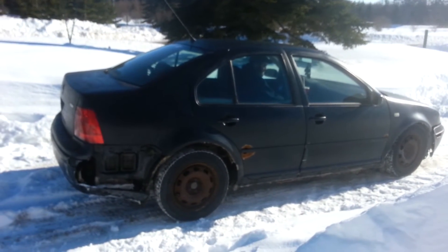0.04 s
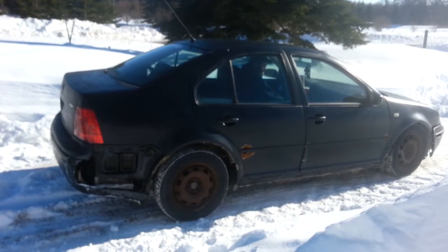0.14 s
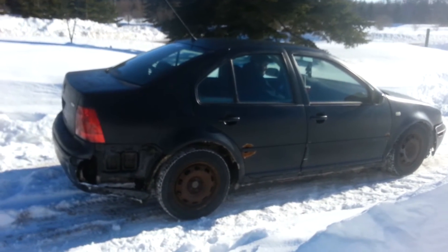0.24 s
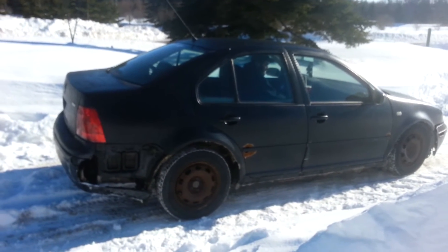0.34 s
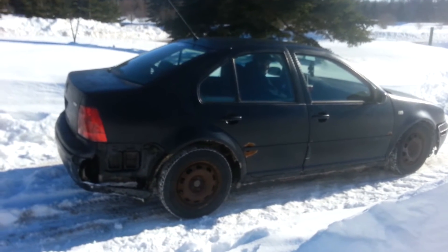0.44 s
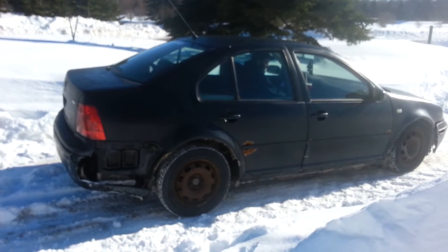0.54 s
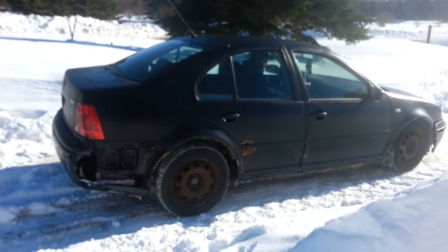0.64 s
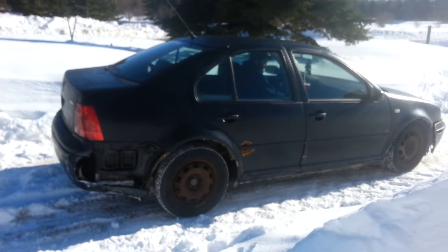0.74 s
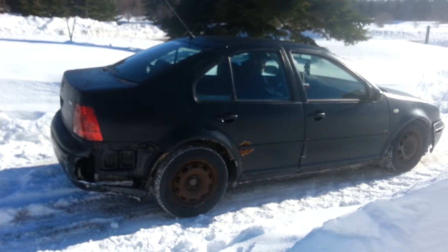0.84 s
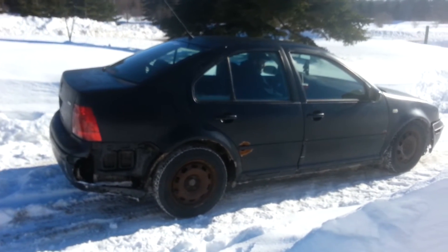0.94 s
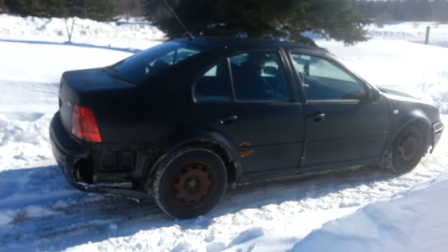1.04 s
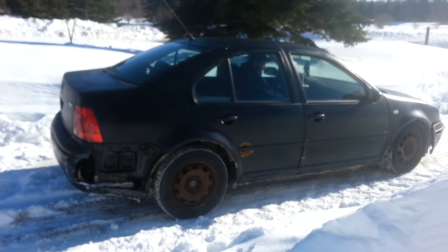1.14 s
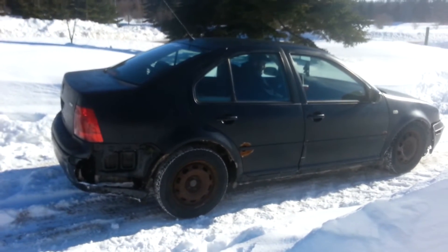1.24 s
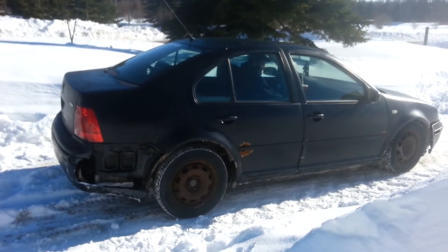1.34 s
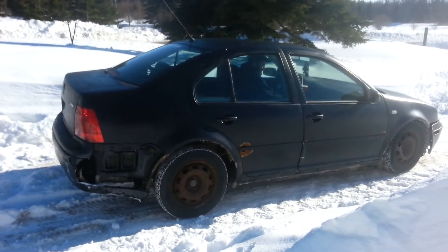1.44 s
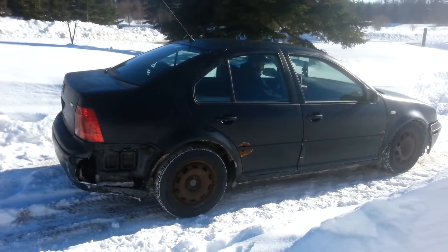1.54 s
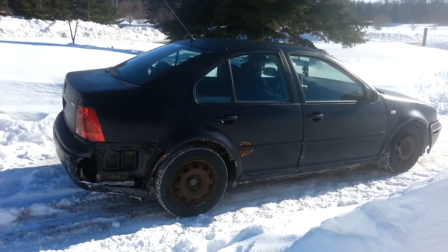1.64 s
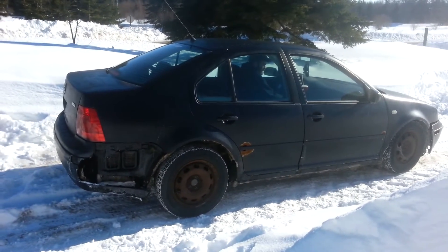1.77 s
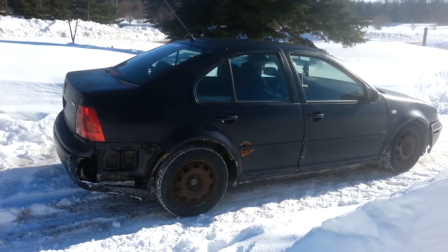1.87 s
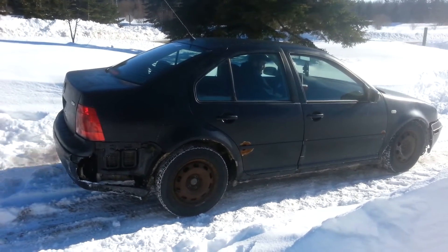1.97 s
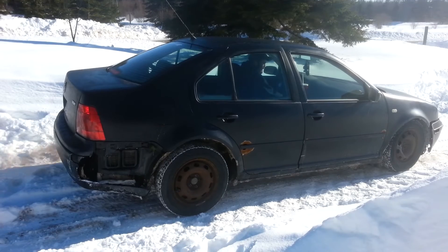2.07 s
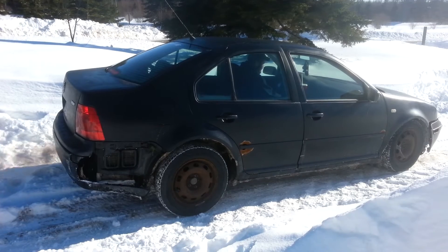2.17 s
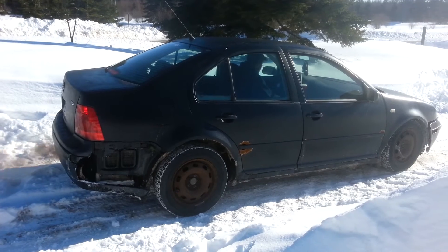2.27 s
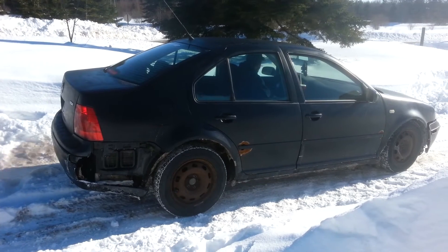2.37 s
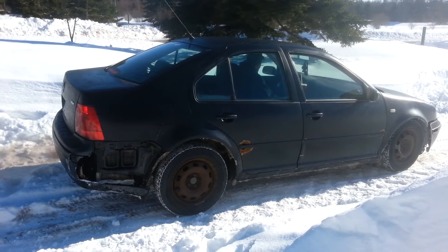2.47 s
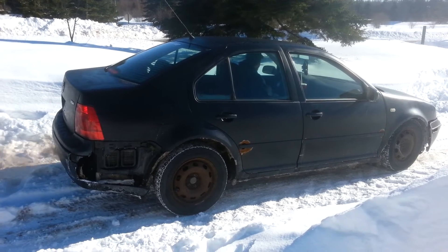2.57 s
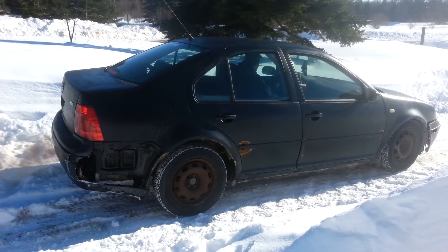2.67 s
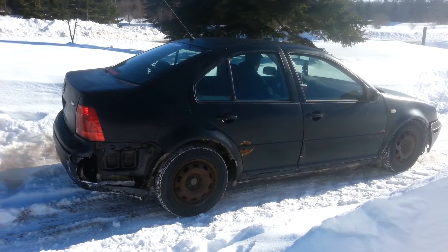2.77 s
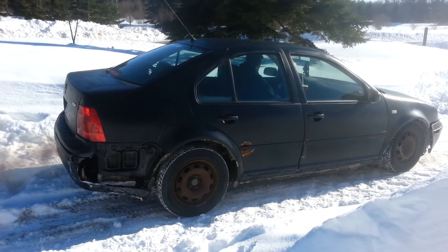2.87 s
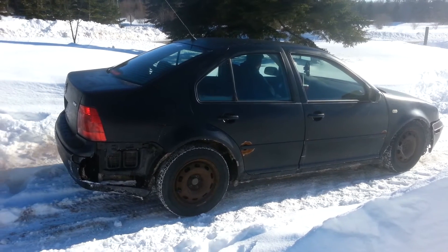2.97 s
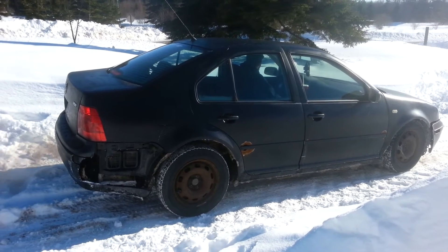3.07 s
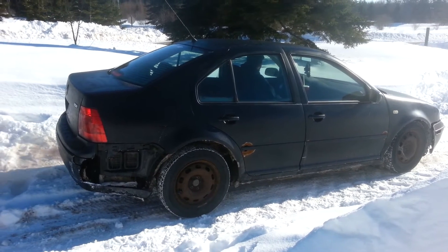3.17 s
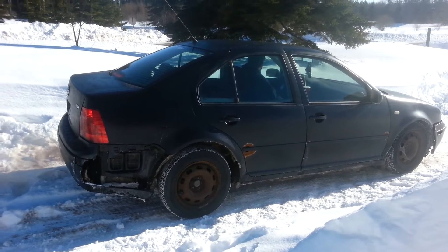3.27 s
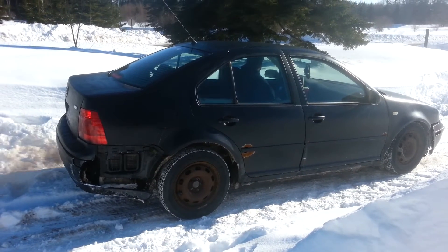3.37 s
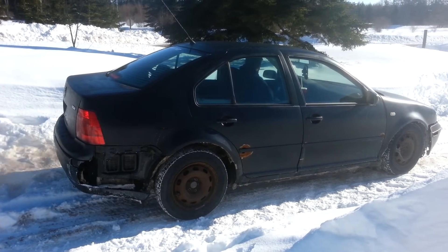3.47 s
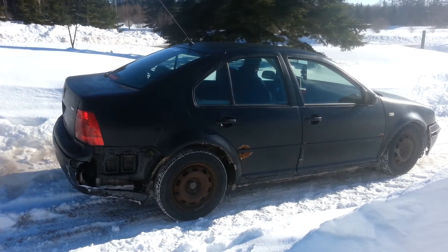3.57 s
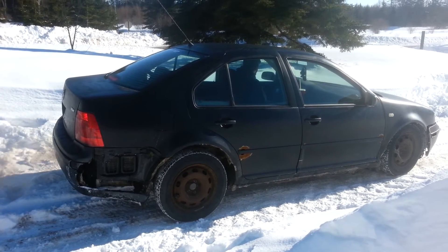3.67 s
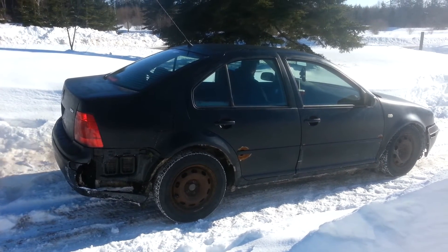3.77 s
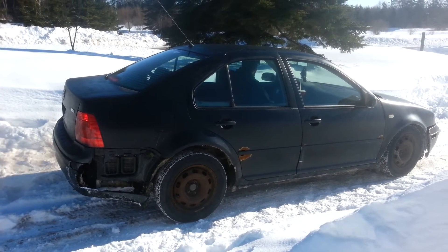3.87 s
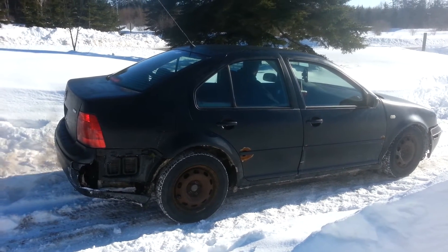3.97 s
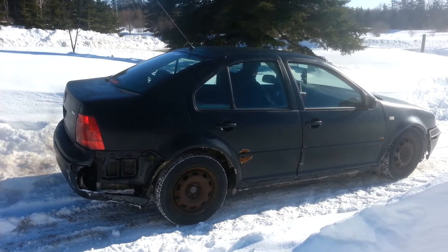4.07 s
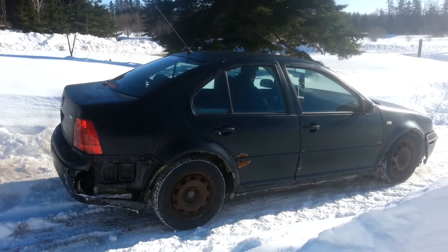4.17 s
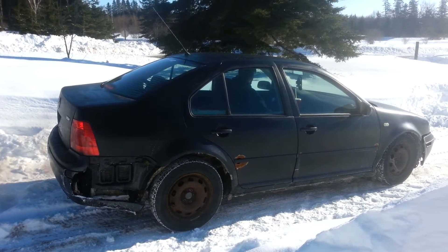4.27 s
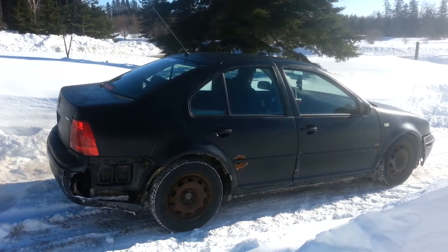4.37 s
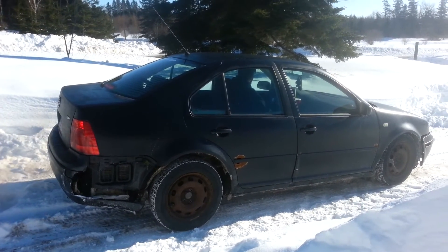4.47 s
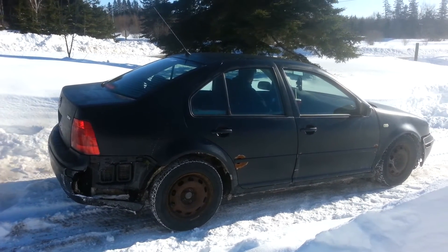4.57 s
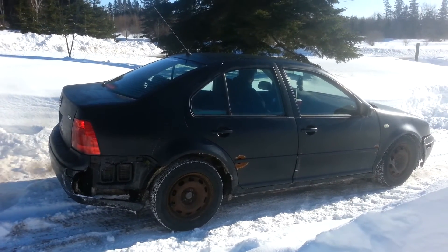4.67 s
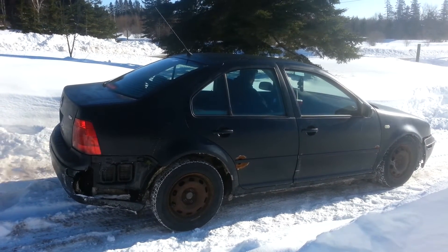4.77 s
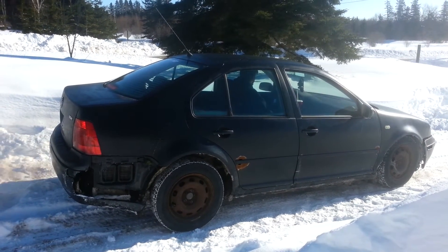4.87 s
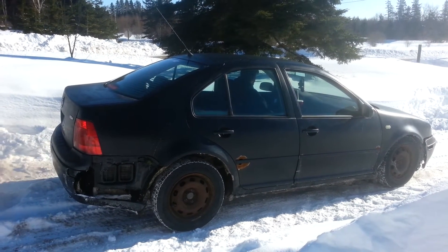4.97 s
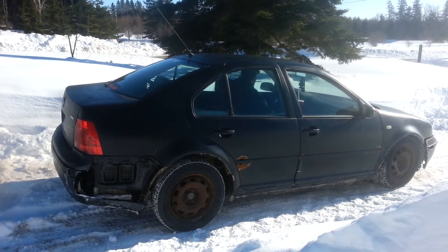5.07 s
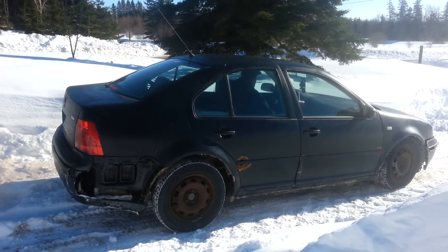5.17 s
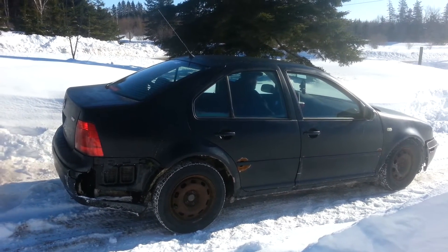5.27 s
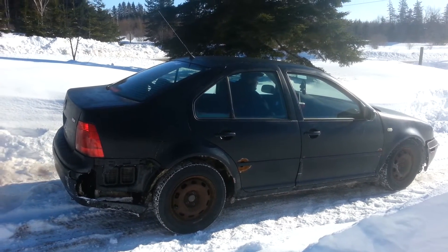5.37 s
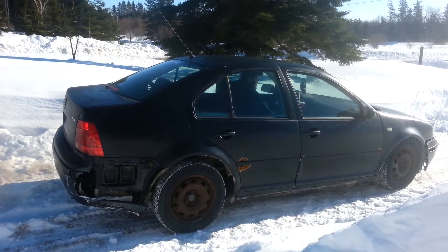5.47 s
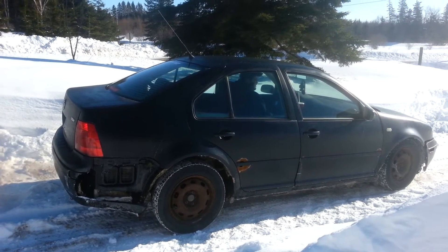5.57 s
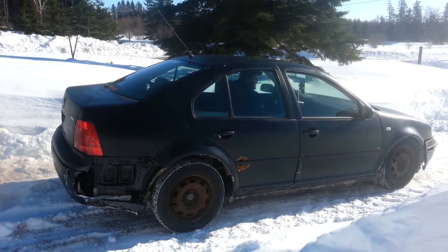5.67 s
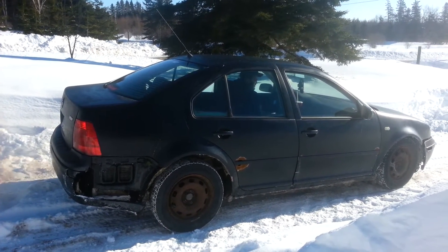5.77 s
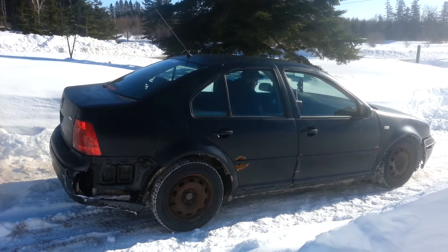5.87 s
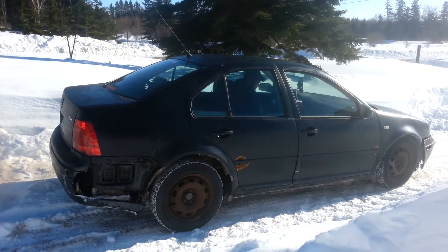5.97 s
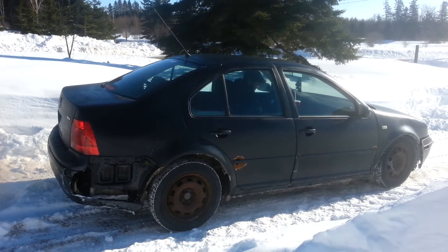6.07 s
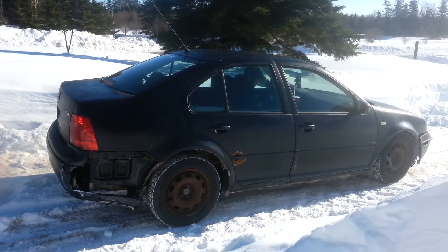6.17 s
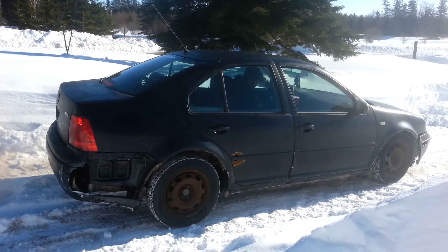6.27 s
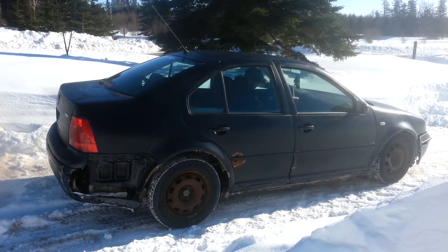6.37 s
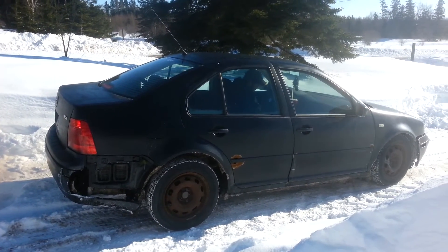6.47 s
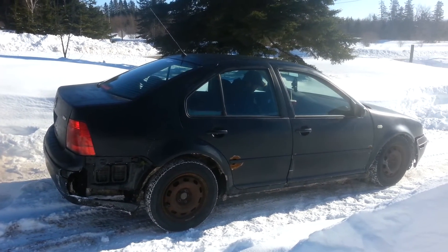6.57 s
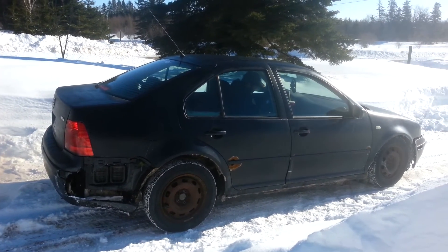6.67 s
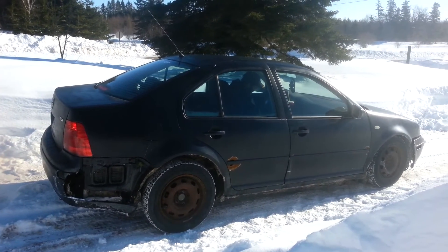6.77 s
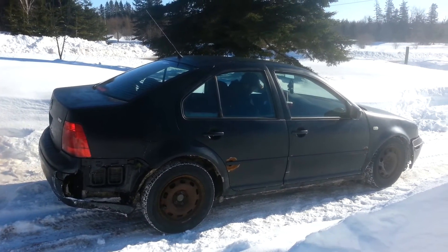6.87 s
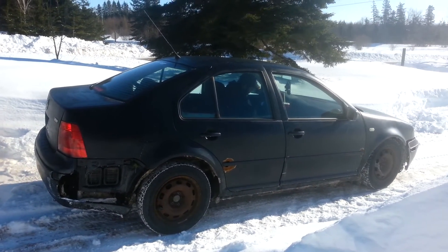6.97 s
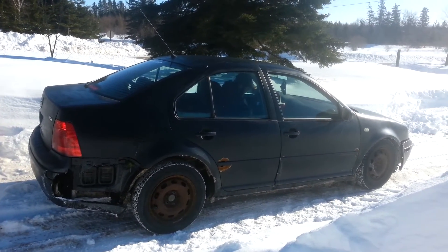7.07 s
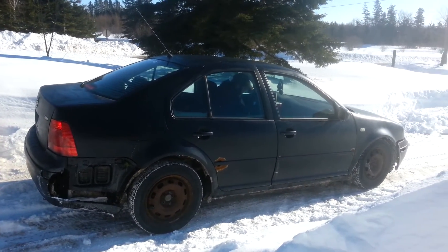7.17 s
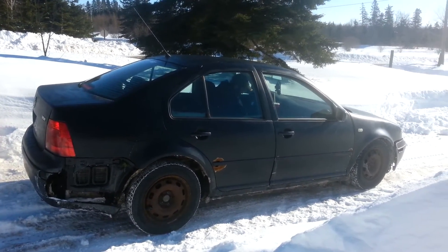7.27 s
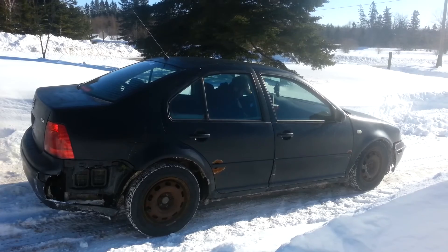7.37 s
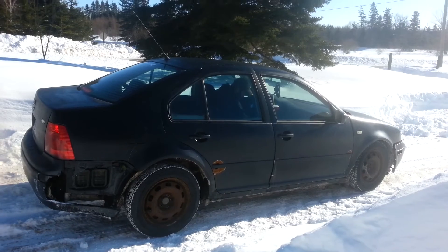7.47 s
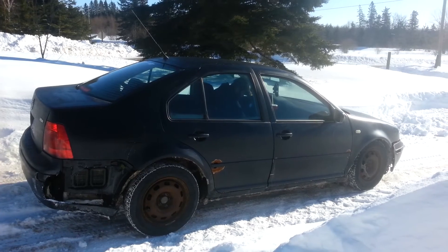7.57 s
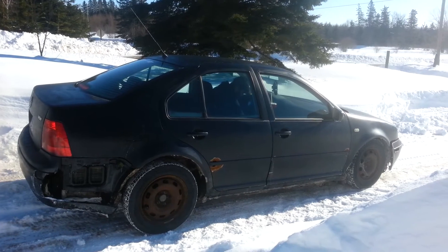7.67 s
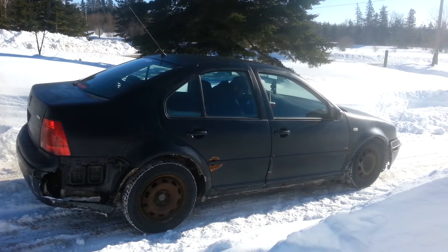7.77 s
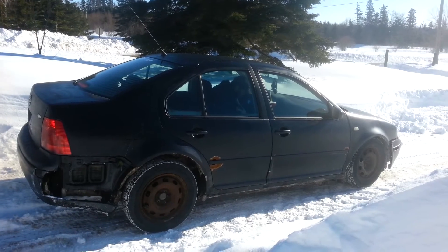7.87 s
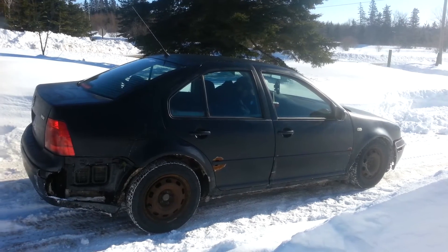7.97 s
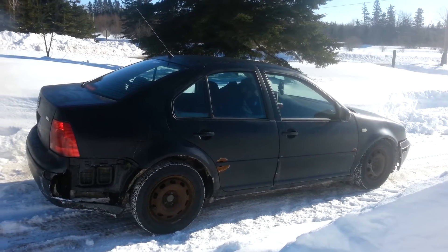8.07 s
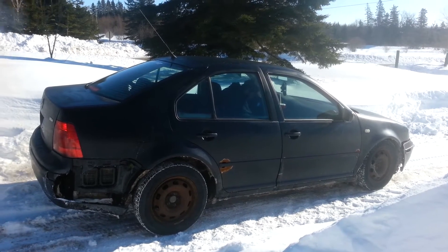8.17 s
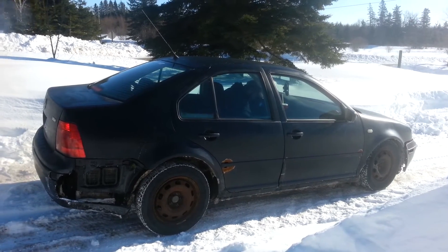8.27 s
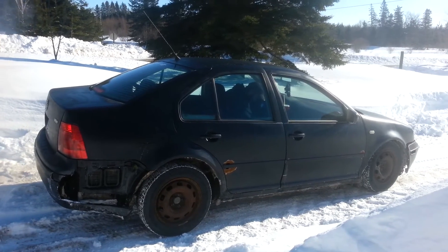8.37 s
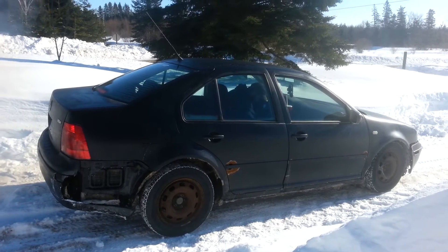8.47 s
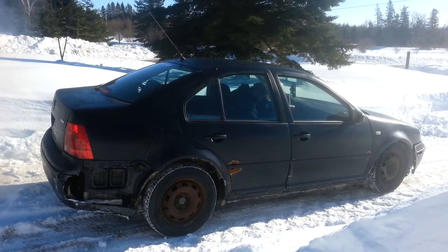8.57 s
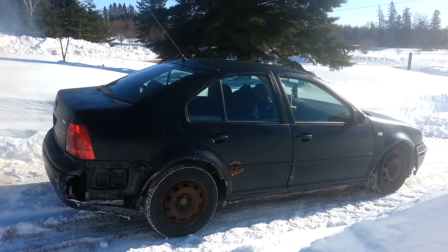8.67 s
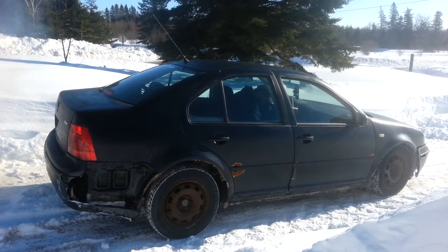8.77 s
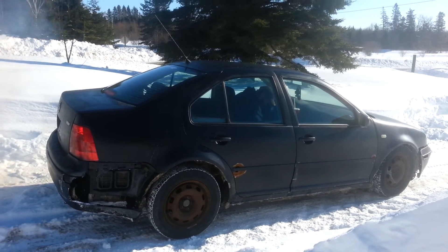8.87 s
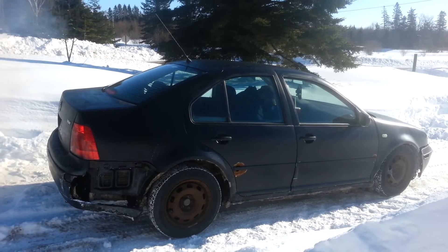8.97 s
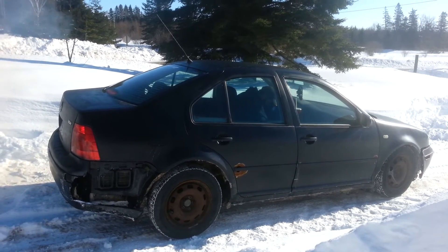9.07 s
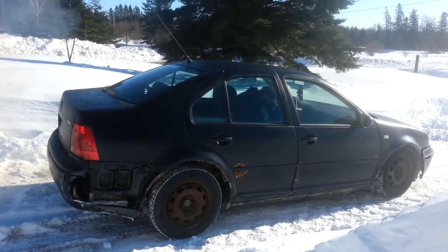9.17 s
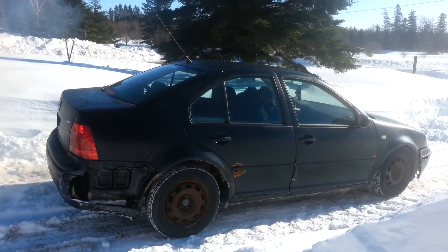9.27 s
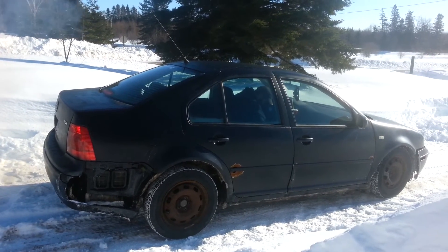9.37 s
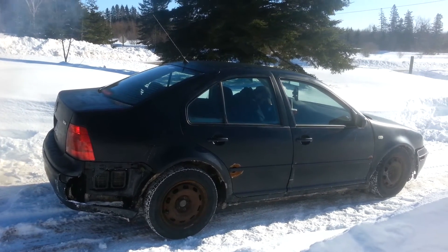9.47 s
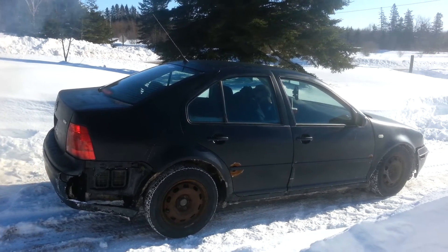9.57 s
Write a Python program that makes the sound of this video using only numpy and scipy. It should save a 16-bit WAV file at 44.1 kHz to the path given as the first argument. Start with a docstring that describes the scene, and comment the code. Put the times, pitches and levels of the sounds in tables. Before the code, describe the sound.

Close beside a car's tailpipe outdoors in snow, a quiet starter churns with short wheezes and weak coughs. After just over a second the diesel catches, racing unevenly with hard exhaust bangs, dry cracks and a breathy hoot. It then slows to a lumpy idle, one cylinder thumping late over constant metallic clatter and a low drone. The stereo pair hears brighter clatter on the left.

```python
"""A starter churns and wheezes, weak strokes cough, and a cold four-cylinder turbodiesel car catches.
It stands outdoors in snow, heard from beside its tailpipe: it flares, hoots and settles to a lumpy idle.
One cylinder keeps firing late and bangs in the pipe, others miss, and the injection clatters throughout.
One crank count times the strokes: pulses ring pipe resonances, noise bursts make gas, rattle and cracks,
short decaying tones make injector pings, and sines make the hoot and the exhaust drone."""
import sys
import numpy as np
from scipy import signal
from scipy.fft import rfft, irfft, next_fast_len
from scipy.io import wavfile
from scipy.ndimage import uniform_filter1d, map_coordinates

SR = 44100
rng = np.random.default_rng(int(sys.argv[2]) if len(sys.argv) > 2 else 0)


def write(x):
    x = np.atleast_2d(x).T
    wavfile.write(sys.argv[1], SR, np.round(np.clip(x, -1, 1) * 32767).astype(np.int16))

N = 425124

# Average speed held by the governor, before surges, stumbles and alignment to the bangs: [t/s, firing rate/Hz]
SPEED = [(1.36, 24.1), (1.55, 29.8), (1.66, 32.3), (1.87, 36.2), (1.98, 42.7), (2.13, 43.6), (2.49, 33.4),
         (2.64, 41.2), (2.84, 35.4), (3.18, 42.0), (3.46, 33.7), (3.65, 38.8), (4.2, 36.6), (6.0, 34.8),
         (8.7, 35.1), (9.0, 37.2), (9.3, 35.1)]
# Strength of the ordinary firings, before stroke-to-stroke differences: [t/s, gas puff/dB, clatter/dB]
LOAD = [(1.4, -17, -26.5), (1.62, -13, -23), (2.1, -14, -25.5), (2.6, -16.5, -23), (3.1, -16.5, -28),
        (3.35, -20, -26.5), (3.6, -14.5, -24.5), (4.1, -21, -27.5), (5.0, -20, -27), (5.7, -22.5, -29.5),
        (7.3, -21, -28.5), (8.7, -20.5, -28), (9.1, -23.5, -34), (9.4, -23, -27.5)]
# Late, hard firings that bang in the exhaust: [t/s, thump/dB, gas puff/dB, front/dB]
BANGS = [(1.3631, -14.5, -14, -15), (1.6502, -10.5, -10, -3), (1.8228, -11.5, -12, -18),
         (1.9728, -8, -8, -5), (2.1305, -17, -12, -21), (2.1531, -11.5, -9.5, -4), (2.2988, -17, -12, -27),
         (2.4579, -10.5, -11.5, -10), (2.5331, -15.5, -11.5, -27), (2.6569, -12, -12, -6.5),
         (2.8672, -11, -12.5, -9), (3.0748, -12.5, -10.9, -10), (3.2643, -15, -10.5, -16),
         (3.3685, -14.5, -16, -15), (3.5356, -15.5, -10.5, -35), (3.5904, -12.5, -9.5, -14),
         (3.9021, -14.5, -10.7, -14), (4.1107, -13.5, -15.5, -19), (4.249, -23, -11, -34),
         (4.3292, -12.5, -11, -15), (4.5386, -11.5, -13, -15), (4.7508, -13.5, -16.5, -11.5),
         (4.9726, -12.5, -11, -16), (5.1905, -10, -13.5, -18.5), (5.4067, -11.5, -13.5, -15.5),
         (5.6222, -12, -18.6, -22), (5.8403, -11.5, -11.5, -19), (6.0611, -12.5, -13.0, -15),
         (6.2798, -16, -13.5, -28), (6.3906, -14.5, -13.2, -21), (6.4996, -16.5, -14.5, -22.4),
         (6.6097, -14, -13.5, -17.5), (6.7195, -15, -16.6, -22), (6.8299, -13.5, -11.5, -15),
         (7.0482, -12.5, -12.5, -16), (7.1559, -14, -16, -29), (7.2684, -11, -14.5, -22),
         (7.3737, -17, -24, -24.8), (7.4829, -14.5, -17.5, -22.3), (7.707, -11.8, -12.5, -14.5),
         (7.812, -19, -20, -29), (7.924, -16, -13.5, -22), (8.0328, -16.5, -18, -29),
         (8.14, -17.0, -20, -31), (8.2474, -13.5, -14.5, -20), (8.3553, -14, -17, -28),
         (8.4637, -13.5, -14, -25), (8.5733, -17.8, -16, -24.1), (8.7928, -10.5, -10.5, -27),
         (9.223, -17.5, -19.7, -35), (9.3335, -16.0, -20.7, -26), (9.444, -17, -14.5, -27),
         (9.5541, -13.5, -13.5, -22.5)]
# Firings that fail: [t/s]
MISFIRES = [1.48, 1.52, 1.73, 1.76, 1.881, 2.04, 2.06, 2.18, 2.2, 2.25, 2.35, 2.4, 2.56, 2.679, 2.969, 3.17,
            3.321, 3.452, 3.771, 3.8, 4.001, 4.439, 4.64, 4.828, 5.048, 5.51, 5.73]
# Weak strokes before the engine catches: [t/s, level/dB, thump relative to that level/dB]
COUGHS = [(0.26, -29, -20), (0.34, -30, -9), (0.5, -26, -19), (0.617, -26, -22), (0.74, -27, -20),
          (0.92, -29.5, -20), (1.022, -21, -11), (1.078, -17.5, -9.5), (1.146, -23.5, -24),
          (1.219, -17.5, -23), (1.277, -19, -7), (1.3225, -14.5, -7.5)]
# Cylinders in firing order, from the one that bangs: [gas puff/dB, clatter/dB, injector ping f/Hz, ping/dB]
CYLINDERS = [(-5.5, -4, 3550, -10.5), (-1, -5, 3500, -1), (-2.5, -6, 2760, -20), (-1, -6.5, 3220, -16)]
# Firings that ignite sharply, with a dry crack: [t/s, level/dB]
SHARP_IGNITIONS = [(1.397, -22), (1.5527, -25), (1.6183, -24), (1.7948, -18), (1.848, -20), (1.9013, -15),
                   (1.926, -24), (1.9504, -21), (2.0156, -27), (2.0857, -22), (2.1086, -22),
                   (2.1326, -15.5), (2.225, -24.5), (2.2758, -13), (2.324, -28), (2.374, -18), (2.43, -17),
                   (2.51, -19), (2.61, -20), (2.7295, -19), (2.8129, -20), (2.8407, -19), (2.9454, -24),
                   (3.0235, -27), (3.0971, -24), (3.5091, -23), (3.565, -21), (3.6875, -20), (3.8198, -27),
                   (3.9291, -36), (4.8908, -22), (4.9472, -18.5), (5.107, -26.5), (5.3234, -21),
                   (6.306, -21), (6.5264, -22), (6.7455, -27), (6.8535, -23), (7.076, -27), (7.2406, -22.5),
                   (7.295, -24), (7.7315, -24.5), (8.488, -23), (9.3599, -27), (9.4702, -28)]
# Whistle of the fast gas at the tailpipe, before swoop and flutter: [t/s, f/Hz, level/dB]
HOOT = [(1.93, 640, -12), (1.97, 720, -10.5), (2.02, 930, -17.5), (2.09, 700, -13), (2.135, 880, -8),
        (2.16, 1030, -15), (2.225, 800, -11), (2.28, 760, -11.5), (2.33, 980, -11.5), (2.38, 810, -14.5),
        (2.435, 740, -16.5), (2.54, 1010, -14.5), (2.59, 880, -13.5), (2.615, 990, -11), (2.735, 1020, -14),
        (2.785, 870, -18), (2.82, 980, -13.5), (2.92, 930, -18), (2.947, 1110, -6.5), (2.99, 900, -16),
        (3.03, 980, -12.5), (3.15, 985, -12), (3.195, 830, -14), (3.28, 830, -20.5), (3.345, 705, -14),
        (3.51, 700, -20.5), (3.6, 750, -13), (3.7, 690, -17), (3.8, 680, -35), (3.95, 680, -19),
        (4.35, 690, -27)]
# Steady note of the exhaust: [t/s, level/dB]
DRONE = [(1.08, -37), (1.19, -45), (1.33, -34), (1.5, -36), (1.85, -23), (2.6, -27), (3.6, -25), (4.1, -27),
         (5.8, -30), (6.4, -29.5), (9.64, -28.5)]
# Harmonics of that note: [multiple of the firing rate, relative level/dB]
DRONE_ORDERS = [(1, -88), (2, 9.5), (3, 19), (4, 9), (5, -17)]
# Whirr of the starter, then of belts and gears: [t/s, level/dB]
WHIRR = [(0.0, -38), (0.9, -36.5), (1.34, -35.5), (1.55, -28.5), (2.6, -28.5), (6.1, -32), (8.7, -30.5),
         (9.1, -34), (9.45, -31.5)]
# Short hisses between the cranking strokes: [t/s, level/dB]
WHEEZES = [(0.425, -47), (0.535, -45), (0.61, -51), (0.7, -50), (0.85, -47), (0.945, -46), (1.02, -45),
           (1.145, -49), (1.225, -44), (1.29, -46)]

# Resonances, all [f/Hz, width/Hz, level/dB]
# Exhaust system
PIPE = [(119.1, 5.1, 1.5), (199, 3.9, 1.5), (245.8, 11.7, 9), (291.5, 12.3, -2), (350.4, 16.2, 2.5),
        (398, 4.1, -1), (430.7, 5.8, -9), (496, 4.6, -9.5), (560, 6.1, -13), (654, 15, -11.5),
        (711, 18, -10.5), (1206, 50, 1), (1635, 200, -9.5), (2430, 150, -6), (3086, 84, 2.5)]
# Colour of the rushing gas
GAS = [(204, 30, 1), (242.4, 36, 9), (358, 33, 3.5), (397.6, 16.5, 6.5), (499.6, 12, 1.5), (658, 89, -0.5),
       (798, 80, -7.5), (963, 55, -4.5), (1130, 42, -9.5), (1557, 114, -14)]
# Engine block and covers
BLOCK = [(1690, 140, -5), (1948, 42, 7), (2208, 90, 7.5), (2530, 170, 3), (2759, 92, 12.5),
         (3087, 79, 10.5), (3390, 53, -16)]
# Ring of a crack
CRACK_RING = [(1024, 120, 1), (1230, 210, 8.5), (1610, 260, 0.5), (1950, 100, 0.5), (2720, 130, 4.5),
              (3030, 73, 0)]
# Ring of the injector snap
INJECTOR = [(3570, 65, -7.5), (4360, 1600, -12.5)]
# Housing of the starter
STARTER_RING = [(1500, 140, -2), (1975, 28, 2), (2100, 56, 4), (2240, 49, -3), (2670, 79, 7),
                (2800, 70, 7.5)]

# Noise spectra, all [f/Hz, relative level per Hz/dB]
# Churning starter
STARTER = [(25, -26), (60, -2.5), (105, 0.5), (130, -0.5), (220, 7), (340, 4), (480, -6), (950, -1),
           (1800, -10), (2450, -6), (2800, -20), (3200, -10), (4000, -19), (6000, -27), (10000, -29.5),
           (14500, -36)]
# Belts and gears
GEARS = [(21, -55), (35, -41), (99, -7.5), (160, -3), (240, -7.5), (301, -11.5), (388, -3.5), (567, -23.5),
         (1180, -14.5), (1410, -25.5), (2400, -20.5), (2730, -22), (5270, -41.5), (9430, -43),
         (14900, -104)]
# Thin metallic sizzle over the knock
SIZZLE = [(2000, -27), (3700, 0), (4500, -33), (5500, 6), (7200, 2.5), (9500, 6), (11000, -2.5),
          (14500, -15.5)]
# Cranking hisses
WHEEZE_COLOUR = [(1500, -20), (3000, 0), (4200, 2), (4900, 4), (5300, -8), (10000, -14), (14500, -30)]

# Left-right likeness of the scattered sound: [f/Hz, correlation 0-1]
ALIKE = [(250, 1), (600, 0.91), (1200, 0.6), (2500, 0), (5000, 0.07), (12000, 0.08)]
# Microphone pair: [f/Hz, left minus right/dB]
BALANCE_DB = [(100, 0.9), (250, -0.5), (550, 1), (1000, -1), (1800, 5.5), (2300, 3), (2780, 9),
              (2970, 11.5), (3150, 10.5), (4300, 11.5), (5300, 4.5), (8000, 2.5), (12000, -1.5)]
TOP_HZ = 14800  # upper limit of the microphones

# A bang kicks the crank on: rise in firing rate (Hz), delay of its peak (s), half width at 1/e (s)
SURGE_RATE, SURGE_DELAY_S, SURGE_WIDTH_S = 4.32, 0.037, 0.035
# A misfire holds the crank back: drop in firing rate (Hz), delay of the dip (s)
STUMBLE_RATE, STUMBLE_S = 2.22, 0.017
# The stroke after a bang burns hard (dB); the governor then cuts fuel as the surge passes (dB, lag in s)
AFTER_BANG_DB, FUEL_CUT_DB, GOVERNOR_LAG_S = 1, 2, 0.024
# Further clatter of that stroke, its further thump at idle, and clatter of a sharp ignition (dB)
AFTER_BANG_CLATTER_DB, AFTER_BANG_THUMP_DB, SHARP_CLATTER_DB = 1, 4, 2.5
# What a misfire lacks (dB)
MISS_PUFF_DB, MISS_CLATTER_DB = 20, 6
# Ordinary thumps grow more slowly than puffs: idle puff (dB), idle thump (dB), slope (dB per dB)
IDLE_PUFF_DB, IDLE_THUMP_DB, THUMP_GROWTH = -21, -27.5, 0.51
# Bang fronts reach the ear directly, before the pipe rings: gain (dB), band edges (Hz)
BLAST_DB, BLAST_LOW_HZ, BLAST_HIGH_HZ = 16.5, 108, 1480
# The hoot arches in each stroke (share of its pitch) and dies away after each firing (s)
HOOT_SWOOP, HOOT_FALL_S = 0.061, 0.0091
# The drone swells with each surge and fades with each stumble (dB)
DRONE_SURGE_DB, DRONE_STUMBLE_DB = 1.5, 6
# Cracks: gain (dB), rise (s), fall (s); small crack of an ordinary firing against its limited puff (dB)
CRACK_DB, CRACK_RISE_S, CRACK_FALL_S, SMALL_CRACK_DB = 3.5, 0.00091, 0.0042, -8.5
# Rattle of the block against the clatter (dB)
RATTLE_DB = -2
# Metal ticks: earliest delay after the firing (s), spread (s), size scatter (dB), gain (dB)
TICK_DELAY_S, TICK_SPREAD_S, TICK_SCATTER_DB, TICK_DB = 0.00099, 0.011, 3, 20
# Injector snap: lead before the firing (s), level against the clatter (dB), scatter (dB)
INJECTOR_LEAD_S, INJECTOR_DB, INJECTOR_SCATTER_DB = 0.0049, -7.5, 2.5
# Injector ping: delay (s), rise (s), fall (s), scatter of pitch (share) and of level (dB)
PING_DELAY_S, PING_RISE_S, PING_FALL_S, PING_DETUNE, PING_SCATTER_DB = 0.001015, 0.001, 0.0054, 0.016, 3.5
STARTER_RING_DB = -4.5  # starter housing against the whirr


def crank():
    """The crank counts firings from the first bang; its speed hunts, and bangs fall on whole counts."""
    speed = curves(SPEED, clock())[0] + hunting(SURGE_RATE, STUMBLE_RATE)
    count = np.cumsum(speed) / SR
    at_bangs = np.interp(np.array(BANGS)[:, 0], clock(), count)
    whole = np.append(0, np.cumsum(np.round(np.diff(at_bangs))))
    return count + np.interp(count, at_bangs, whole - at_bangs)


def firings(count):
    """Combustion gives each stroke a time, thump, puff and clatter level, a bang flag and a cylinder."""
    number = np.arange(int(count[-1]) + 1)
    times = np.interp(number, count, clock())
    nearest = lambda s: np.argmin(abs(times[:, None] - np.asarray(s)), axis=0)
    bang_s, bang_thump, bang_puff, _ = np.transpose(BANGS)
    banging = nearest(bang_s)
    hard = np.isin(number, banging)
    after_bang = np.isin(number - 1, banging)
    crack_s = np.array(SHARP_IGNITIONS)[:, 0]
    sharp = nearest(crack_s)
    missed = np.setdiff1d(nearest(MISFIRES), sharp)

    # Load, cylinder, fuel and chance set the ordinary strokes
    cylinder = (number - banging[-1]) % len(CYLINDERS)
    uneven = np.array(CYLINDERS)[cylinder, :2].T
    fuel = AFTER_BANG_DB * after_bang - FUEL_CUT_DB * surge(times - GOVERNOR_LAG_S)
    chance = rng.standard_normal((len(times), 3))
    scatter = 0.58 * chance[:, 0] + 1.36 * chance[:, 1:].T  # shared, then separate for puff and clatter
    puff, clatter = curves(LOAD, times) + uneven + fuel + scatter
    puff[missed] -= MISS_PUFF_DB
    clatter[missed] -= MISS_CLATTER_DB
    thump = IDLE_THUMP_DB + THUMP_GROWTH * (puff - IDLE_PUFF_DB) + 4.2 * np.isin(number, sharp)
    clatter[sharp] += SHARP_CLATTER_DB
    clatter[after_bang] += AFTER_BANG_CLATTER_DB
    thump[after_bang & (puff < IDLE_PUFF_DB + 3)] += AFTER_BANG_THUMP_DB

    # Bangs take their own levels; sharp ignitions take their own times unless they bang
    thump[banging], puff[banging] = bang_thump, bang_puff - 3
    clatter[hard] += 1.5
    times = times + ~hard * rng.normal(0, 0.0004, len(times))
    times[sharp] = np.where(hard[sharp], times[sharp], crack_s)

    s, level, rel = np.transpose(COUGHS)
    never = np.zeros(len(s), bool)
    coughs = [s, level + rel - 2, level - 8, level - 15, never, np.arange(len(s)) % len(CYLINDERS)]
    strokes = [times, thump, puff, clatter, hard, cylinder]
    return [np.append(early, later) for early, later in zip(coughs, strokes)]


def exhaust(times, thump, puff, hard):
    """Pressure pulses ring the pipe: ordinary firings as round pushes, bangs as steeper shocks."""
    pipe = resonator(PIPE)
    push_response = lambda hz: pipe(hz) * low_pass(hz, edge_hz=680)
    shock_response = lambda hz: pipe(hz) * low_pass(hz, edge_hz=955)
    front_response = lambda hz: pipe(hz) * low_pass(hz, edge_hz=1400) * 1j * hz / (1j * hz + 1500)
    pulse = -amp(thump + 29.5)
    pushes = through(spikes(times + 0.00088, pulse * ~hard), push_response)
    shocks = through(spikes(times + 0.00026, pulse * hard), shock_response)
    # The more gas a bang drives, the harder its front cracks
    fronts = through(spikes(times + 0.00011, -amp(puff + 23.0) * hard), front_response)
    return pushes + shocks + fronts


def blast():
    """The bare pressure jump at the front of each bang is heard without the pipe's ring."""
    s, _, _, front_db = np.transpose(BANGS)
    jump = spikes(s + 0.00017, -amp(front_db + BLAST_DB))
    band = lambda hz: low_pass(hz, edge_hz=BLAST_HIGH_HZ) ** 2 * 1j * hz / (1j * hz + BLAST_LOW_HZ)
    return through(jump, band)


def gas(times, puff):
    """Each pulse drives a turbulent puff out of the pipe; the strongest ones rasp more brightly."""
    flow = bursts(times, puff + 2.3, rise=0.0029, fall=0.0062)
    rasp = bursts(times, 2 * puff + 8, rise=0.0029, fall=0.0014)  # grows 2 dB per dB of puff
    rasp_band = lambda hz: low_pass(hz, edge_hz=1890) ** 2 * hz / (hz + 1100)
    rush = through(flow * noise(), resonator(GAS))
    return rush + through(rasp * patchy(depth_db=4.5), rasp_band)


def hoot(times, puff):
    """Fast puffs whistle at the pipe mouth, the pitch arching up and back within each stroke."""
    t = clock()
    hz, level_db = curves(HOOT, t)
    excess_db = np.minimum(puff - curves(LOAD, times)[0], 3)
    flow = bursts(times, 0.5 * excess_db, rise=0.0019, fall=HOOT_FALL_S)
    stroke = np.interp(t, np.sort(times), np.arange(len(times))) % 1
    arch = HOOT_SWOOP * (np.sin(np.pi * stroke) - 0.7)
    flutter = 0.015 * wobble(40) + 0.025 * wobble(300)
    cycles = np.cumsum(hz * (1 + arch + flutter)) / SR
    blowing = np.interp(t, [1.88, 1.94, 4.0, 4.45], [0, 1, 1, 0])
    return blowing * flow * amp(level_db - 1 + 4.1 * wobble(160)) * np.sin(2 * np.pi * cycles)


def drone(count):
    """The lowest firing harmonics leave the muffler as a smooth note."""
    note = sum(amp(db) * np.sin(2 * np.pi * order * count) for order, db in DRONE_ORDERS)
    running = np.interp(clock(), [0.99, 1.04], [0, 1])
    level_db = curves(DRONE, clock())[0] + hunting(DRONE_SURGE_DB, DRONE_STUMBLE_DB)
    return running * amp(level_db) * unit(note)


def cracks(times, puff, hard):
    """Sharp ignitions spit short, dry noise bursts; every stroke that does not bang adds a small one."""
    s, db = np.transpose(SHARP_IGNITIONS)
    starts = np.append(s, times[~hard]) - 0.0005
    small_db = np.minimum(puff[~hard], IDLE_PUFF_DB) + SMALL_CRACK_DB
    spit = bursts(starts, np.append(db, small_db) + CRACK_DB, rise=CRACK_RISE_S, fall=CRACK_FALL_S)
    return through(spit * ragged(depth_db=3.5) * patchy(depth_db=0.5), resonator(CRACK_RING))


def knock(times, clatter):
    """Combustion rattles the block, over ticking valve gear and under a thin metallic sizzle."""
    rattle = bursts(times - 0.002, clatter + RATTLE_DB, rise=0.0055, fall=0.005)
    valves = amp(curves(WHIRR, clock())[0] - 11.5)
    blows = np.hypot(rattle, valves) * ragged(depth_db=2.5) * patchy(depth_db=4.5)
    sizzle = bursts(times - 0.003, clatter - 16, rise=0.0015, fall=0.024)
    hiss = sizzle * ragged(depth_db=1.0) * noise()
    return through(blows, resonator(BLOCK)) + through(hiss, shape(SIZZLE))


def ticks(times, clatter, count):
    """Pistons, valves and injectors tick the block after each firing; each port hears its own mix."""
    when = times[:, None] + TICK_DELAY_S + TICK_SPREAD_S * rng.random((len(times), count))
    size = amp(clatter[:, None] + TICK_DB + TICK_SCATTER_DB * rng.standard_normal(when.shape))
    mix = lambda: np.cos(2 * np.pi * rng.random(when.shape))
    ports = [spikes(when.ravel(), (size * mix()).ravel()) for _ in range(2)]
    return through(np.array(ports), resonator(BLOCK))


def injector_snaps(times, clatter):
    """The injector snaps just before each firing, a brief noise burst that rings its body."""
    snap_db = clatter + INJECTOR_DB + INJECTOR_SCATTER_DB * rng.standard_normal(len(times))
    snap = bursts(times - INJECTOR_LEAD_S, snap_db, rise=0.0026, fall=0.0013)
    return through(snap * noise(), resonator(INJECTOR))


def pings(times, clatter, cylinder):
    """Each injector rings as a decaying tone of its own pitch, a little different at every stroke."""
    t = np.arange(SR // 20) / SR
    chance = rng.standard_normal((len(times), 2))
    hz, db = np.array(CYLINDERS)[cylinder, 2:].T
    hz = hz * (1 + PING_DETUNE * chance[:, 0])
    db = db + clatter + PING_SCATTER_DB * chance[:, 1]
    envelope = (1 - np.exp(-t / PING_RISE_S)) * np.exp(-t / PING_FALL_S)
    ring = amp(db)[:, None] * np.sin(2 * np.pi * hz[:, None] * t) * envelope
    start = np.round((times + PING_DELAY_S) * SR) / SR
    return spikes((start[:, None] + t).ravel(), ring.ravel())


def whirr():
    """The starter churns and rings its housing until the engine takes over with its belts and gears."""
    level_db, = curves(WHIRR, clock())
    cranking = np.interp(clock(), [1.3, 1.7], [1, 0])
    grind = through(ragged(depth_db=1.0) * patchy(depth_db=2.5), shape(STARTER))
    churn = amp(2.0 + 1.1 * wobble(16.8)) * grind
    housing = amp(STARTER_RING_DB) * through(noise(), resonator(STARTER_RING))
    gears = amp(1.6) * through(noise(), shape(GEARS))
    return amp(level_db) * (cranking * (churn + housing) + (1 - cranking) * gears)


def wheezes():
    """Air hisses in short bursts while the starter turns the engine over."""
    s, db = np.transpose(WHEEZES)
    breath = bursts(s, db, rise=0.011, fall=0.028)
    return through(breath * ragged(depth_db=1.0) * noise(), shape(WHEEZE_COLOUR))


def surge(at):
    """Speed swells after each bang, each swell 1 at its peak."""
    since = at[:, None] - np.array(BANGS)[:, 0]
    return np.exp(-((since - SURGE_DELAY_S) / SURGE_WIDTH_S) ** 2).sum(1)


def stumble(at):
    """Speed dips after each misfire, each dip 1 at its deepest."""
    u = np.maximum(at[:, None] - np.array(MISFIRES), 0) / STUMBLE_S
    return (u * np.exp(1 - u)).sum(1)


def hunting(per_surge, per_stumble):
    """A control that rises after bangs and falls after misfires, one value per sample."""
    at = np.arange(0, N / SR, 0.001)
    return np.interp(clock(), at, per_surge * surge(at) - per_stumble * stumble(at))


def spikes(times, sizes):
    """One impulse at each time."""
    return np.bincount(np.clip(np.round(times * SR).astype(int), 0, N), sizes, N + 1)[:N]


def bursts(times, db, rise, fall):
    """An envelope that swells and dies at each time, with a weak tail of reflections; powers add."""
    t = np.arange(SR // 12) / SR
    tail = amp(-30) * np.exp(-t / 0.02)
    one = (1 - np.exp(-(t / rise) ** 2)) * (np.exp(-t / fall) + tail)
    power = signal.fftconvolve(spikes(times, amp(db) ** 2), (one / one.max()) ** 2)[:N]
    return np.sqrt(abs(power))


def noise():
    """White stereo noise, alike in the bass and nearly unrelated in the treble."""
    turn = lambda hz: np.arccos(np.clip(along(ALIKE, hz), -1, 1)) / 2
    split = lambda hz: np.array([np.cos(turn(hz)), np.sin(turn(hz))])
    mid, side = filtered(rng.standard_normal((2, N)), split)
    return np.array([mid + side, mid - side])


def patchy(depth_db):
    """Stereo noise of rms 1 whose colour shifts randomly every few hundredths of a second."""
    z = signal.stft(noise(), nperseg=512)[2]
    field = uniform_filter1d(rng.standard_normal(z.shape[1:]), 4, 0)  # smooth over frequency
    field = uniform_filter1d(field, 4, 1)  # smooth over time
    return unit(signal.istft(z * amp(depth_db * unit(field)), nperseg=512)[1][:, :N])


def wobble(rate):
    """A smooth random curve, rate knots a second."""
    return map_coordinates(rng.standard_normal(int(N * rate / SR) + 4), [np.arange(N) * rate / SR])


def ragged(depth_db):
    """A gain of rms 1 that roughens noise on a scale of a few milliseconds."""
    return unit(amp(depth_db * wobble(450)))


def low_pass(hz, edge_hz):
    """A causal two-pole low-pass response."""
    return 1 / (1 + 1j * np.sqrt(2) * hz / edge_hz - (hz / edge_hz) ** 2)


def resonator(modes):
    """The causal response of a set of resonances; its skirts fall steeply in the treble."""
    f = np.arange(0, SR / 2, 1.0)
    h = sum(amp(db) * 1j * f * w / (c * c - f * f + 1j * f * w) for c, w, db in modes)
    h = h * low_pass(f, edge_hz=2830) ** 2
    return lambda hz: np.interp(hz, f, h)


def shape(points):
    """The response of a (Hz, dB) spectrum."""
    return lambda hz: amp(along(points, hz))


def filtered(x, response):
    """x times a complex response of frequency."""
    m = next_fast_len(N + SR // 2)
    return irfft(rfft(x, m) * response(np.fft.rfftfreq(m, 1 / SR)), m)[..., :N]


def through(x, response):
    """Filter x so that white noise would keep its power."""
    power = np.mean(abs(response(np.arange(0, SR / 2, 2.0))) ** 2)
    return filtered(x, response) / np.sqrt(power)


def along(points, hz):
    """(Hz, value) points read on a log frequency axis."""
    f, v = np.transpose(points)
    return np.interp(np.log(hz + 1), np.log(f + 1), v)


def curves(rows, at):
    """Each column after the time, read at the given times."""
    s, *cols = np.transpose(rows)
    return [np.interp(at, s, c) for c in cols]


def clock():
    """The time of every sample."""
    return np.arange(N) / SR


def amp(db):
    """Decibels to gain."""
    return 10 ** (np.asarray(db) / 20)


def unit(x):
    """Scale to rms 1."""
    return x / np.sqrt(np.mean(x ** 2) + 1e-20)


def scene():
    """The crank times the engine's strokes; starter and wheezes follow their own curves."""
    count = crank()
    times, thump, puff, clatter, hard, cylinder = firings(count)
    tailpipe = exhaust(times, thump, puff, hard) + blast() + gas(times, puff)
    tailpipe = tailpipe + hoot(times, puff) + drone(count)
    metal = knock(times, clatter) + ticks(times, clatter, count=5)
    metal = metal + injector_snaps(times, clatter) + pings(times, clatter, cylinder)
    return tailpipe + cracks(times, puff, hard) + metal + whirr() + wheezes()


def record(dry):
    """A microphone pair: the right port leads, deep bass is cut and peaks beyond full scale clip."""
    side = np.array([[0.5], [-0.5]])
    lag = 3 / SR
    ports = lambda hz: amp(side * along(BALANCE_DB, hz)) * np.exp(-2j * np.pi * hz * side * lag)
    low_cut = lambda hz: low_pass(-1 / (hz + 1), edge_hz=1 / 50)  # mirrored in frequency, it passes the highs
    heard = np.clip(filtered(dry, lambda hz: ports(hz) * low_cut(hz)), -1, 1)
    return filtered(heard, lambda hz: hz < TOP_HZ)


dry = scene()
out = record(dry)
write(out)
```